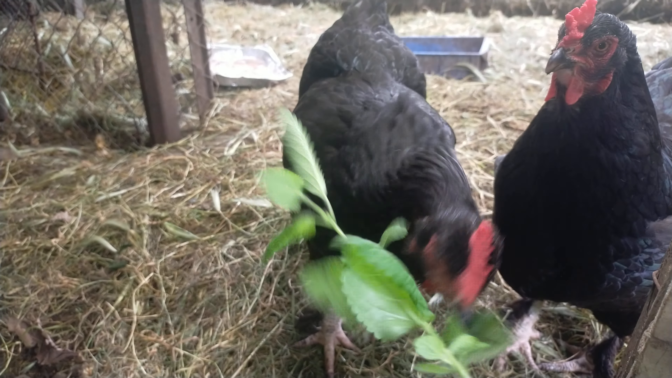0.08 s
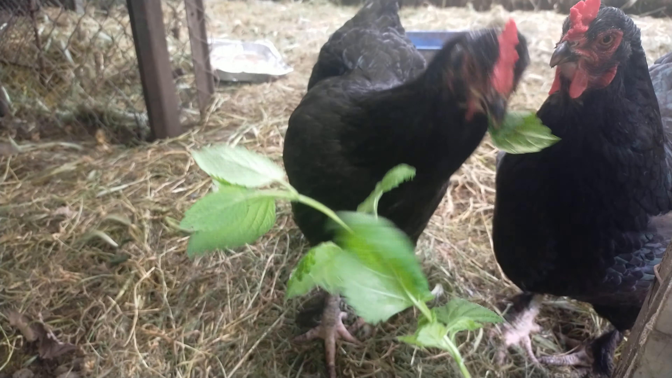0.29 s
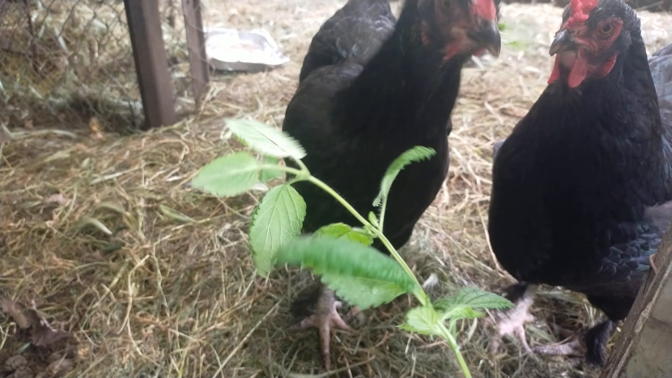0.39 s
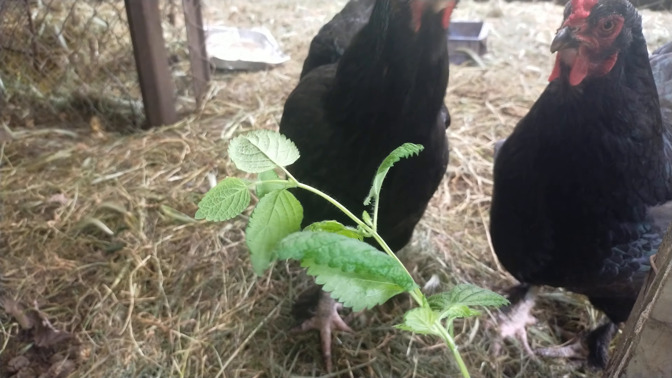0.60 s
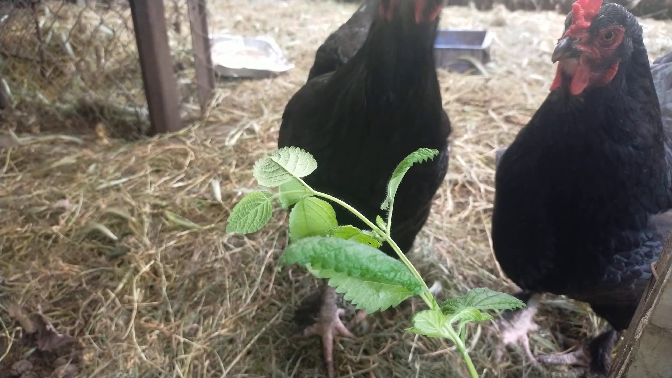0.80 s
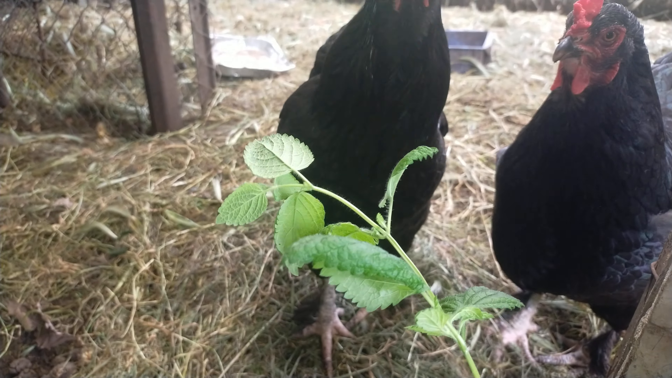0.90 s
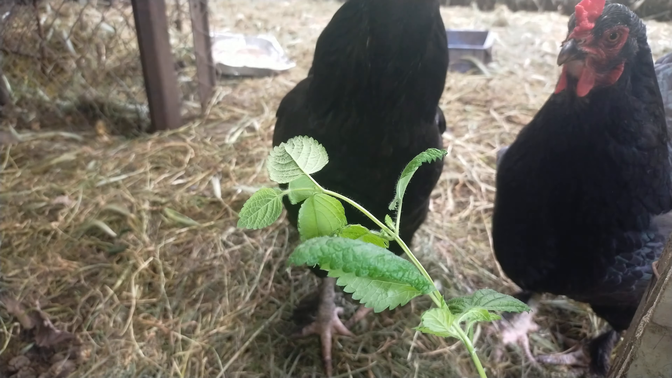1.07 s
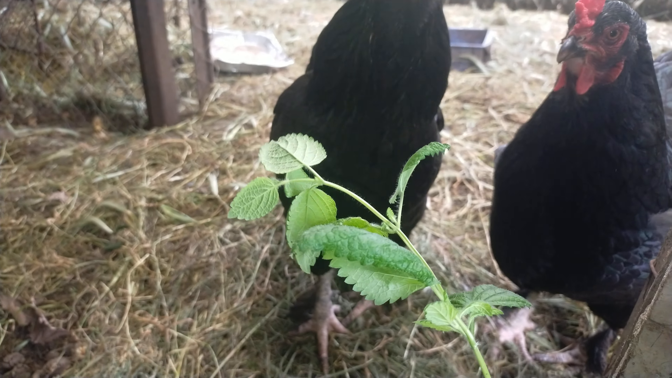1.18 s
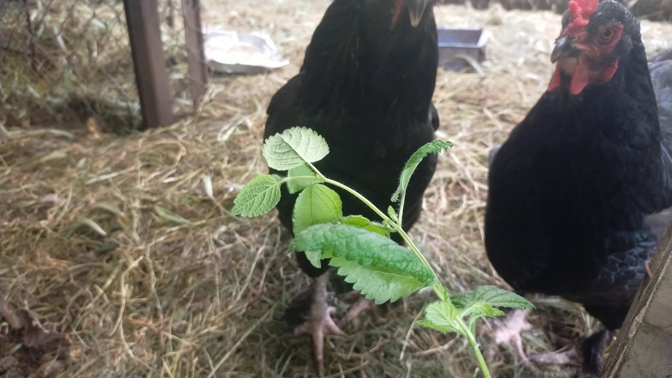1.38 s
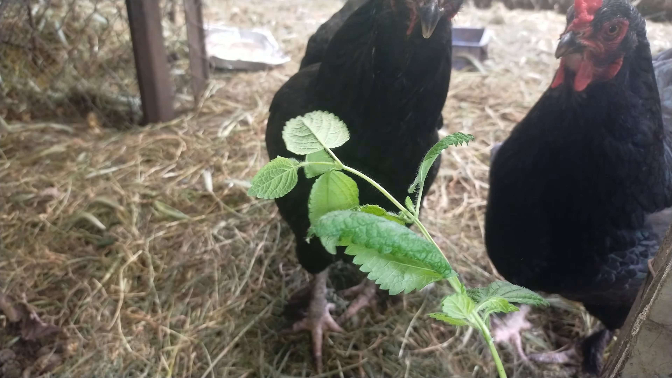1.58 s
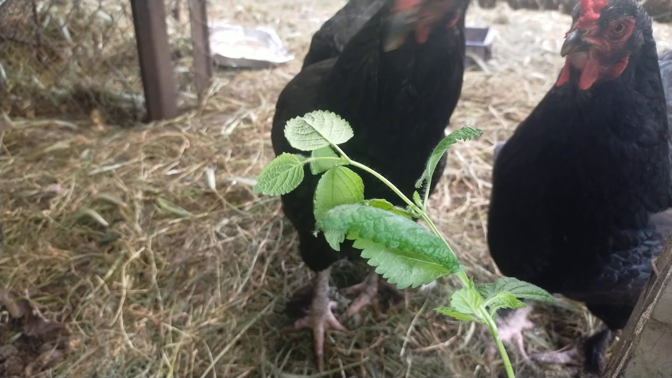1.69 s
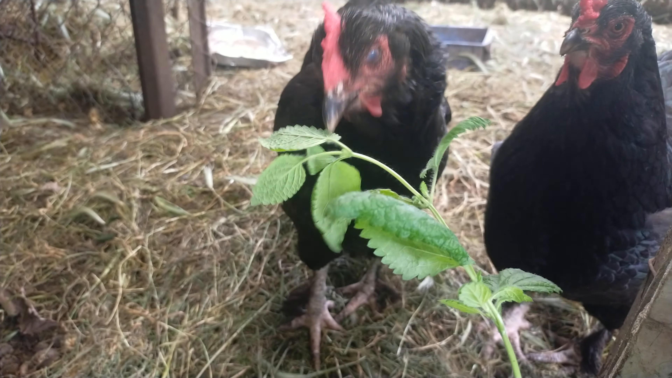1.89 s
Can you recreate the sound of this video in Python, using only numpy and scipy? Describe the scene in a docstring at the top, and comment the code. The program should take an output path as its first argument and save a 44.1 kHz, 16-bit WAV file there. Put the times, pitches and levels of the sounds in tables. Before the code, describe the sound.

Crisp leaf tearing by a hen, very near and dry, bursts early and breaks into small ticks, muffled knocks and light straw brushing; then near silence outdoors, with a faint low drone and tiny far bird whistles.

```python
"""A hen in a straw-covered run pecks at a leafy sprig close to the microphone and tears a piece off.
The leaf gives way in quick runs of bright snaps: single clicks that ring briefly, then scatter.
Soft knocks are damped swings; straw and leaves rustle more and more faintly as the hens shift their
feet, in swells of tiny fibre clicks. Far behind lie soft outdoor noise, a low drone that swells in the
second half, and small birds whistling in short wavering glides."""
import sys
import numpy as np
from scipy import signal
from scipy.fft import rfft, irfft
from scipy.io import wavfile
from scipy.ndimage import uniform_filter1d

SR = 44100
rng = np.random.default_rng(int(sys.argv[2]) if len(sys.argv) > 2 else 0)


def store_pcm(level_fs):
    """Save levels as 16-bit WAV."""
    pcm = np.round(np.clip(level_fs, -1, 1) * 32767).astype(np.int16)
    wavfile.write(sys.argv[1], SR, np.atleast_2d(pcm).T)


N = 83790
TIME = np.arange(N) / SR


def from_db(db):
    """Amplitude factor of a level in dB."""
    return 10 ** (np.asarray(db) / 20)


def rms_one(x):
    """Scale to an RMS of 1."""
    return x / np.sqrt(np.mean(x ** 2) + 1e-20)


def peak_one(x):
    """Scale to a peak of 1."""
    return x / np.abs(x).max()


def gain_curve(rows):
    """Gain over time from (time_s, gain_db) rows."""
    return from_db(np.interp(TIME, *np.transpose(rows)))


def gain_at(points, size):
    """Gain at every FFT bin from (freq_hz, gain_db) rows, interpolated over log frequency."""
    hz, db = np.transpose(points)
    bins = np.maximum(np.arange(size // 2 + 1) * SR / size, 1)
    return from_db(np.interp(np.log(bins), np.log(hz), db))


def click(colour, size=512):
    """Minimum-phase click: the shortest causal sound that has this colour."""
    cepstrum = irfft(np.log(gain_at(colour, size)))
    # fold the later half onto the earlier one, so that nothing sounds before the onset
    cepstrum[1:size // 2] *= 2
    cepstrum[size // 2 + 1:] = 0
    return irfft(np.exp(rfft(cepstrum)))


def resonate(x, hz, width_hz):
    """One two-pole resonance with gain 1 on top."""
    r = np.exp(-np.pi * width_hz / SR)
    zeros = np.array([1, 0, -1]) * (1 - r * r) / 2
    poles = [1, -2 * r * np.cos(2 * np.pi * hz / SR), r * r]
    return signal.lfilter(zeros, poles, x + 1e-18)


def lowpass(order, cutoff_hz):
    """Butterworth low-pass sections."""
    return signal.butter(order, cutoff_hz, fs=SR, output="sos")


def add(out, start_s, sound):
    """Mix a sound in at a time."""
    start = int(np.clip(start_s * SR, 0, N - 1))
    out[start:start + len(sound)] += sound[:N - start]


def random_moments(rate_per_s):
    """True at random samples, this many per second on average."""
    return rng.random(N) < rate_per_s / SR


REFLECTIONS_PER_S = 1300


def tail(x, t60_s):
    """Separate small reflections that die away by 60 dB in t60_s, at unit energy."""
    arrivals = rng.standard_normal(N) * random_moments(REFLECTIONS_PER_S)
    onset = 1 - np.exp(-TIME / .002)
    response = arrivals * from_db(-60 * TIME / t60_s) * onset
    response = response / np.sqrt(np.sum(response ** 2) + 1e-20)
    return signal.fftconvolve(x, response)[:N]


# colour of the outdoor air: freq_hz, relative_db (per Hz)
AIR_COLOUR = [(12, -25.5), (25, -3.5), (60, -1.5), (110, -6.5), (180, -12.5), (250, -15), (360, -19),
              (580, -19), (920, -13), (1180, -19.5), (2000, -32.5), (3200, -42), (4800, -36.5),
              (6800, -27.5), (7700, -28.5), (8500, -48), (11000, -75)]
# level of the air at the microphone: time_s, level_db
AIR_LEVEL = [(0, -58.5), (.5, -61), (.9, -60.5), (1.4, -62), (1.9, -63)]


def outdoor_air():
    """Soft, mostly low outdoor noise: white noise shaped in frequency and level."""
    noise = irfft(rfft(rng.standard_normal(N)) * gain_at(AIR_COLOUR, N), N)
    return rms_one(noise) * gain_curve(AIR_LEVEL)


# bands of a faint far drone: pitch_hz, width_hz, level_db (before the gain below)
DRONE_BANDS = [(88, 13, -71), (124, 38, -66.5), (247.8, 29, -74), (330, 79, -77.5)]
# rise and fall of the drone: time_s, gain_db
DRONE_SWELL = [(0, -17), (.9, -10.5), (1.1, 3.5), (1.3, 0.5), (1.6, -0.5), (1.9, -8.5)]


def far_drone():
    """Noise narrowed by doubled low resonances, swelling in the second half."""
    out = np.zeros(N)
    for hz, width_hz, db in DRONE_BANDS:
        band = resonate(rng.standard_normal(N), hz, width_hz)
        out += from_db(db) * rms_one(resonate(band, hz, width_hz))
    return out * gain_curve(DRONE_SWELL)


# colour of a snap, shared by stray ticks and tearing leaf: freq_hz, gain_db
SNAP_COLOUR = [(100, -33.5), (500, -38.5), (950, -21.5), (1600, -23), (2100, -24.5), (2550, -23),
               (3000, -35), (3570, -20), (4150, -28.5), (4900, -13.5), (5400, -5.5), (6800, -0.5),
               (7700, -5.5), (8600, -12), (11000, -8.5), (16000, -24.5)]
STRAY_TICKS_PER_S = 14
STRAY_START_DB, STRAY_FADE_DB_PER_S = -50, 7   # typical peak at the start, and its fall


def stray_ticks():
    """Now and then a lone settling stalk gives a tiny click, fainter as the hens come to rest."""
    unevenness_db = np.clip(2 * rng.standard_normal(N), -4, 4)
    sizes = from_db(STRAY_START_DB - STRAY_FADE_DB_PER_S * TIME + unevenness_db)
    ticks = sizes * random_moments(STRAY_TICKS_PER_S)
    return signal.fftconvolve(ticks, peak_one(click(SNAP_COLOUR)))[:N]


# soft knocks and thuds: start_s, peak_db, pitch_hz, t60_s, tick_db (against the peak)
KNOCKS = [(0.054, -39, 650, 0.0029, -10), (0.1304, -45, 450, .008, -18), (.2110, -39, 570, 0.028, -22),
          (0.2125, -42, 900, .022, -16), (0.3507, -35, 620, 0.0036, -9), (0.351, -46.5, 120, 0.07, -29),
          (0.3971, -48, 660, 0.0061, -20), (0.4091, -34, 600, 0.0028, -14),
          (.4430, -46.5, 1100, 0.013, -20), (0.4539, -30, 340, 0.012, -2), (0.4638, -36.5, 330, 0.016, -32),
          (0.4839, -28, 323, 0.018, -26), (0.5045, -46.5, 500, 0.0065, -17), (0.6069, -48, 900, 0.035, -19),
          (.7545, -51, 900, 0.03, -22), (0.9064, -44.5, 830, 0.019, -11), (.9183, -43.5, 880, .013, -19),
          (1.0555, -44, 80.5, 0.049, -32), (1.286, -56, 120, 0.08, -30)]
# colour of straw, shared by the knocks' ticks and the rustle: freq_hz, gain_db
STRAW_COLOUR = [(100, -23), (500, -14.5), (1000, -4), (1600, -7.5), (2300, -9.5), (3000, -16.5),
                (3700, -10.5), (4400, -11), (5300, -8), (6500, 1), (7600, 4.5), (8600, -16), (16000, -31)]
KNOCK_SOFTNESS = 2.2   # the contact dulls above this multiple of the pitch


def knocks():
    """Cushioned contacts: a few damped swings with a faint straw tick on top."""
    out, t = np.zeros(N), TIME[:SR // 10]
    tick = peak_one(click(STRAW_COLOUR))
    for start_s, db, hz, t60_s, tick_db in KNOCKS:
        swing = np.sin(2 * np.pi * hz * t) * from_db(-60 * t / t60_s)
        swing = signal.sosfilt(lowpass(2, min(KNOCK_SOFTNESS * hz, SR / 4)), swing)
        add(out, start_s, -from_db(db) * peak_one(swing))
        add(out, start_s, from_db(db + tick_db) * tick)
    return out


FIBRES_PER_S, FIBRE_SPREAD_DB = 3500, 3.5


def crackle():
    """Dense tiny clicks of uneven size and either sign, from slipping fibres."""
    sizes = from_db(FIBRE_SPREAD_DB * np.minimum(rng.exponential(1, N), 4))
    return sizes * rng.choice([-1, 1], N) * random_moments(FIBRES_PER_S)


# brushes through straw and leaves: middle_s, length_s, level_db, ring_hz, body_db (gain of the body)
BRUSHES = [(0.091, 0.0075, -55.5, 7400, -3), (0.109, 0.006, -46, 7450, 1), (0.116, 0.0049, -50, 6700, -1.5),
           (0.129, 0.011, -38.5, 7370, -5), (0.164, 0.056, -53, 7100, -4), (0.23, .008, -35.5, 7100, 1),
           (0.253, .02, -42.5, 7200, -0.5), (0.305, 0.047, -56.5, 7200, -11), (0.374, 0.023, -46, 7030, -8),
           (0.424, 0.013, -51.5, 6700, -2), (0.442, 0.006, -44, 6800, 1.5), (0.462, 0.015, -48.5, 6800, 6),
           (0.4852, 0.0068, -50.5, 6200, 3), (0.516, 0.021, -52.5, 6600, 2.5),
           (0.569, 0.03, -50.5, 7150, -0.5), (.596, 0.0089, -55.5, 6200, 4),
           (0.596, 0.0049, -59.5, 2200, 7), (.61, 0.015, -60, 6940, 5), (0.655, 0.053, -63.5, 6600, 2),
           (0.702, 0.0097, -58.5, 7200, 0), (.718, 0.015, -51.5, 7200, -2), (0.746, 0.011, -55, 6760, 5),
           (0.811, 0.07, -62, 6960, 3), (0.871, 0.023, -58, 6500, -1), (0.887, 0.016, -55, 6500, 5),
           (.99, .06, -73, 7000, -1.5), (1.088, 0.032, -64.5, 7340, 2), (1.275, 0.056, -55.5, 7100, -4.5),
           (1.352, 0.018, -54.5, 7470, -1)]
BRUSH_WIDTH_HZ, BRUSH_RING_DB = 1100, 8
BODY_BELOW_HZ = 4800


def rustle():
    """Each brush is a swell of fibre clicks with a ring and a body of its own."""
    out = np.zeros(N)
    fibres = signal.fftconvolve(crackle(), click(STRAW_COLOUR))[:N]
    body = signal.sosfiltfilt(lowpass(4, BODY_BELOW_HZ), fibres)
    bright = fibres - body
    for middle_s, length_s, db, ring_hz, body_db in BRUSHES:
        swell = np.exp(-2 * ((TIME - middle_s) / length_s) ** 2)
        ring = from_db(BRUSH_RING_DB) * resonate(fibres, ring_hz, BRUSH_WIDTH_HZ)
        brush = swell * (bright + from_db(body_db) * body + ring)
        # match the energy of the swell, so that level_db holds however the clicks fall
        evening = np.sqrt(np.sum(swell ** 2) / (np.sum(brush ** 2) + 1e-20))
        out += from_db(db) * brush * evening
    return out


# crisp snaps of leaf and straw, close to the microphone: start_s, peak_db (before scatter), ring_hz
SNAPS = [(0.1272, -21, 8000), (0.1296, -23.5, 7500), (0.1308, -31, 7200), (.1307, -24, 7350),
         (0.133, -36, 6770), (0.1336, -37, 6900), (.1533, -30, 7300), (0.2063, -9, 6700),
         (0.2075, -10.5, 7150), (.2090, -21, 6900), (.2106, -8, 6280), (0.2118, -10.5, 6900),
         (0.2135, -4, 6660), (.2157, -26.5, 6600), (0.2174, -23.5, 6600), (0.2164, -17, 6300),
         (0.222, -20.5, 7170), (0.227, -28.5, 7440), (.2302, -40.5, 7200), (0.2541, -20, 7530),
         (.3710, -48.5, 7360), (.3762, -40, 7050), (0.3879, -33.5, 7500), (0.421, -33.5, 7300),
         (0.4283, -44, 6200), (0.4398, -39, 6700), (0.453, -30.5, 7340), (0.4847, -42, 6750),
         (.5785, -37.5, 6300), (0.5524, -38, 7300), (.7030, -40, 7240), (0.7456, -40, 6700),
         (1.3473, -45.5, 7400)]
SNAP_WIDTH_HZ, SNAP_RING_DB = 850, 7.5
SCATTER_DB, SCATTER_T60_S = -11, 0.06   # early scatter from the surroundings
LATE_DB, LATE_T60_S = -25.5, .26   # fainter, longer scatter


def snaps():
    """Each breaking fibre is one click that rings for about a millisecond, then scatters."""
    out, crack = np.zeros(N), click(SNAP_COLOUR)
    for start_s, db, ring_hz in SNAPS:
        ring = from_db(SNAP_RING_DB) * resonate(crack, ring_hz, SNAP_WIDTH_HZ)
        add(out, start_s, from_db(db) * peak_one(crack + ring))
    scatter = from_db(SCATTER_DB) * tail(out, SCATTER_T60_S)
    late = from_db(LATE_DB) * tail(out, LATE_T60_S)
    return out + scatter + late


# notes of distant small birds: start_s, length_s, peak_db (before the echo), start_hz, end_hz
CHIRPS = [(.820, 0.022, -69.5, 3650, 3560), (1.281, .028, -71.5, 4200, 4040),
          (1.497, 0.035, -63.5, 6320, 5820), (1.516, 0.069, -70, 6060, 5930),
          (1.797, 0.047, -79.5, 4830, 4930)]
CHIRP_WAVER_HZ = 173   # RMS wander of the pitch
CHIRP_ECHO_DB, CHIRP_T60_S = -3.5, 0.39


def birds():
    """Short whistles, gliding and wavering in pitch, blurred by distance."""
    out = np.zeros(N)
    wander = uniform_filter1d(rng.standard_normal(N), size=100)
    waver = CHIRP_WAVER_HZ * rms_one(wander)
    for start_s, length_s, db, start_hz, end_hz in CHIRPS:
        progress = np.clip((TIME - start_s) / length_s, 0, 1)
        hz = start_hz + (end_hz - start_hz) * progress + waver
        whistle = np.sin(2 * np.pi * np.cumsum(hz) / SR)
        out += from_db(db) * np.sin(np.pi * progress) * whistle
    return out + from_db(CHIRP_ECHO_DB) * tail(out, CHIRP_T60_S)


def scene():
    """Everything, near and far, goes to one microphone."""
    far = outdoor_air() + far_drone() + birds()
    near = stray_ticks() + knocks() + rustle() + snaps()
    return (far + near)[None]


CUTOFF_HZ = 8800


def record(dry):
    """The top is cut steeply, with everything from the cutoff up at least 42 dB down."""
    return signal.sosfilt(signal.cheby2(10, 42, CUTOFF_HZ, fs=SR, output="sos"), dry)


dry = scene()
out = record(dry)
store_pcm(out)
```